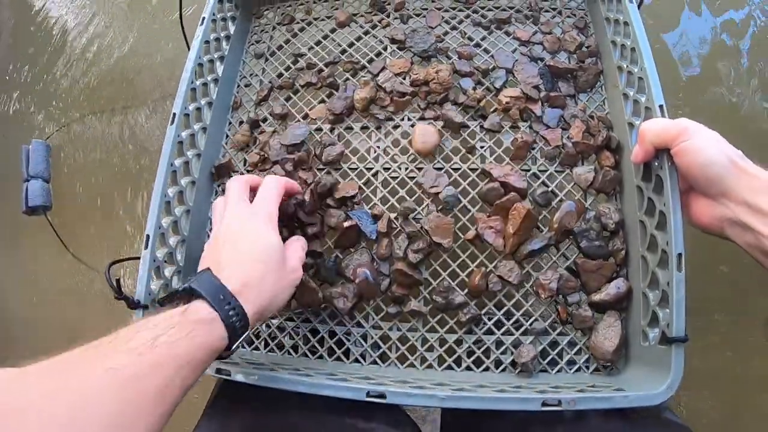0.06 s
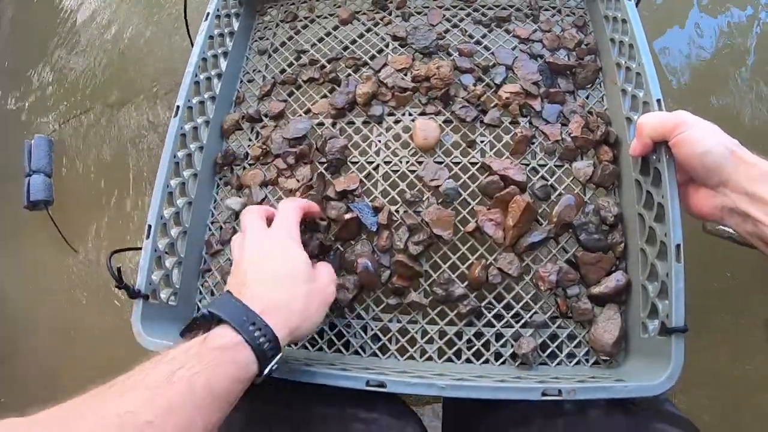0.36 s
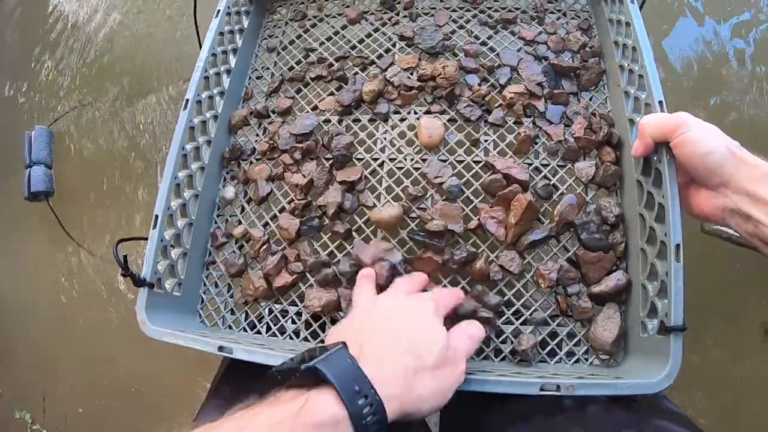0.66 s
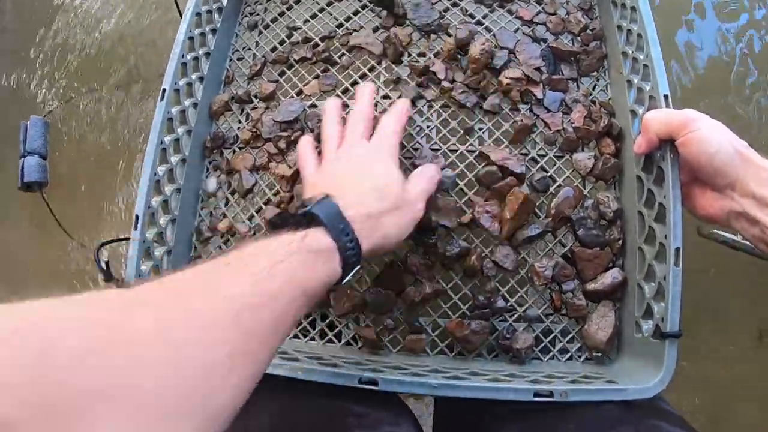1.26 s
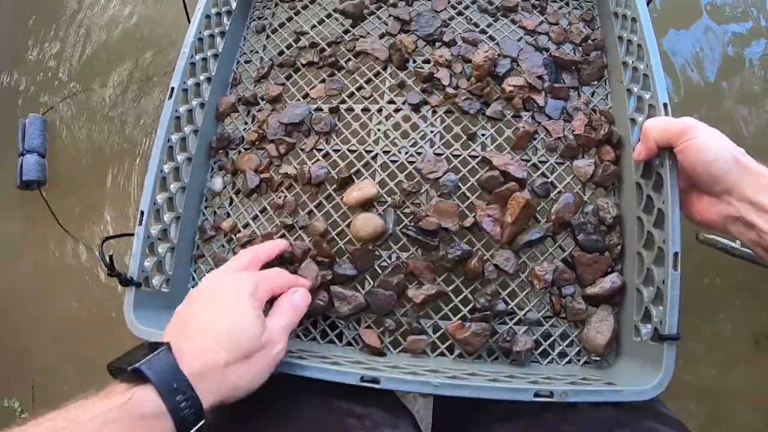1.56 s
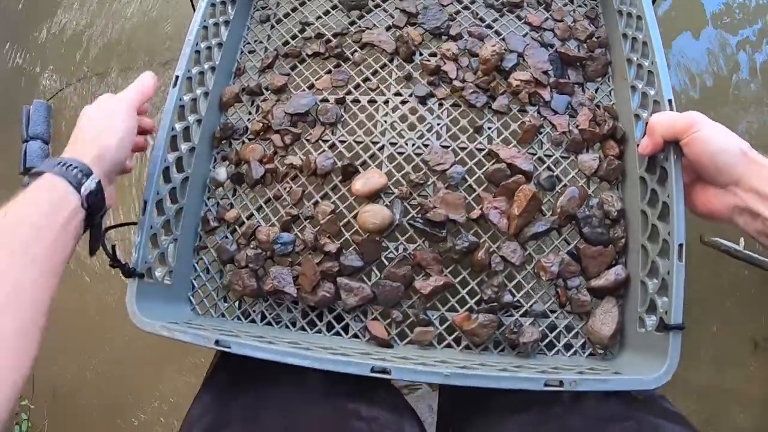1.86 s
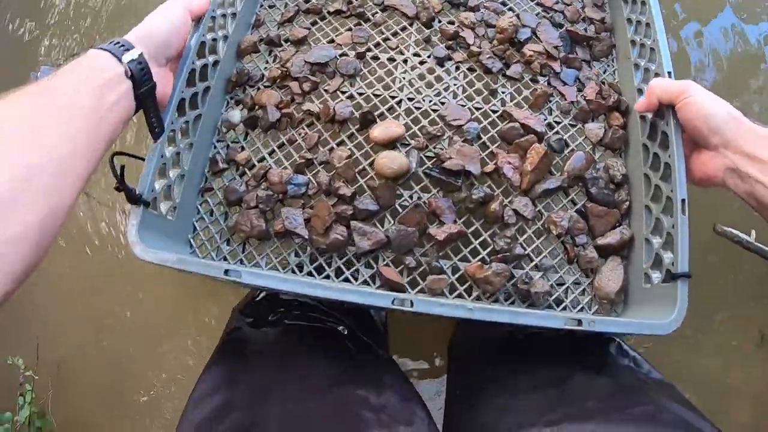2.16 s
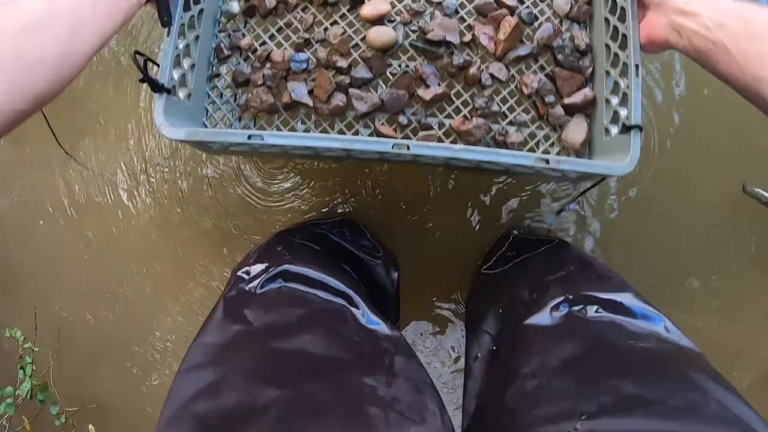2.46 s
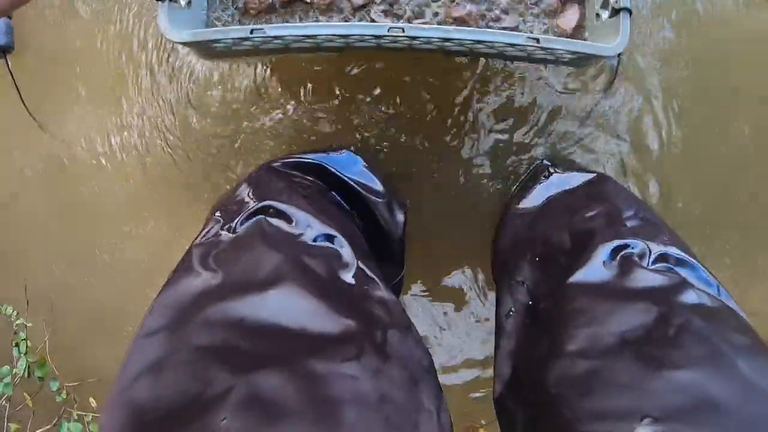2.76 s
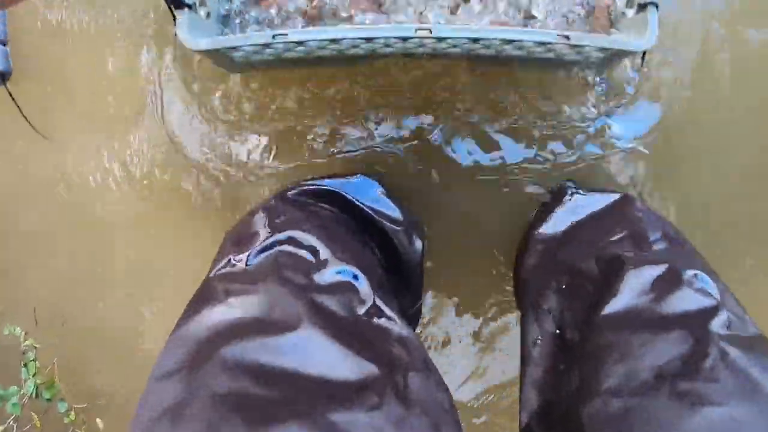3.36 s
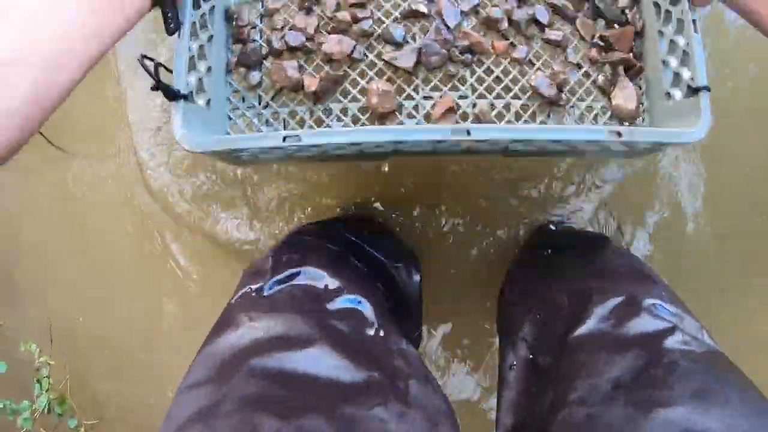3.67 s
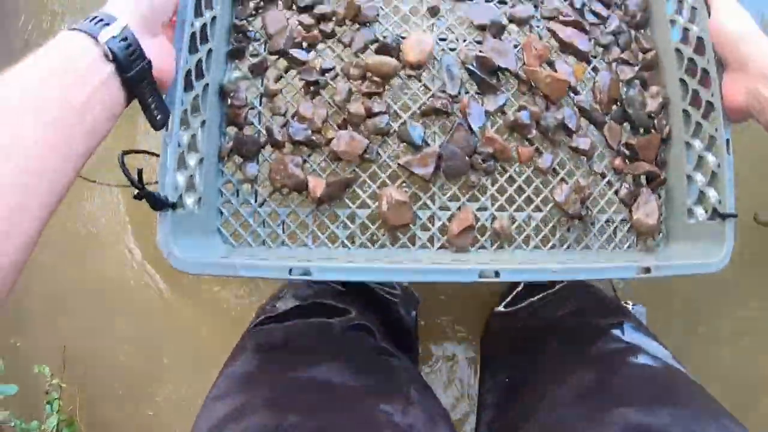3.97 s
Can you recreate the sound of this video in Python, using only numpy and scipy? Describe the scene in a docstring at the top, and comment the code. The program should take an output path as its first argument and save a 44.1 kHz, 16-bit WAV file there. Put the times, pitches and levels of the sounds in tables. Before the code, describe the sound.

Close up and outdoors, stones clatter against plastic mesh in several gritty sweeps. After a brief lull, the basket hits river water with a hiss, then rises gushing and dripping. A soft low hum throbs behind it.

```python
"""Above a river, close to the microphone, a hand rakes wet stones over a plastic mesh basket.
Each impact excites the damped modes of stone and mesh. The basket is slapped onto the water and
jets hiss up through the mesh; it is pushed under, heaved out with a gurgling splash and left to
drain. The water sounds chiefly by bubble resonance: the larger the bubble, the lower its note.
A low hum throbs behind it all."""
import sys
import numpy as np
from scipy import signal
from scipy.fft import rfft, irfft
from scipy.io import wavfile
from scipy.ndimage import uniform_filter1d

SR = 44100
rng = np.random.default_rng(int(sys.argv[2]) if len(sys.argv) > 2 else 0)


def digitize_waveform(pressure):
    """Quantize a signal to 16-bit integers and store it at the path in sys.argv[1].

    Rows of a 2-D input are taken as channels; values are limited to [-1, 1].
    """
    field = np.atleast_2d(pressure).T
    bounded = np.clip(field, -1, 1)
    quanta = np.round(bounded * 32767).astype(np.int16)
    wavfile.write(sys.argv[1], SR, quanta)


N = 176400
T = np.arange(N) / SR
HIT_T = T[:2600]

# Spectral envelopes (frequency [Hz], gain [dB])
AIR_SPECTRUM = [(25, -6.5), (55, -8.5), (85, 5), (130, -7), (300, -7.5), (650, -22.5), (4500, -36.5),
                (7500, -34.5), (15000, -61)]
BASKET_SPECTRUM = [(150, -39), (320, 0), (680, -5.5), (998, -0.5), (1240, -6.5), (1500, 3), (1810, 1.5),
                   (2150, -3.5), (4240, -7.5), (7280, -4.5), (15000, -41.5)]
GRIT_SPECTRUM = [(2000, -8), (7200, 6), (15000, -9.5)]
RUB_SPECTRUM = [(400, -8.5), (1200, 5), (2800, 0.5), (4500, -5.5), (15000, -27)]
JET_SPECTRUM = [(180, -50), (300, -13), (1020, -8.5), (1540, 1), (7500, -2), (15000, -18.5)]
SLAP_SPECTRUM = [(1500, -7), (6500, 4.5), (15000, -21)]
GURGLE_SPECTRUM = [(40, -4), (200, 3.5), (780, -2.5), (2000, -47)]
SPLASH_SPECTRUM = [(400, -32), (900, -2), (2400, -3), (4300, -11), (10000, -44)]
SPRAY_SPECTRUM = [(2500, -23), (4500, -3), (7300, -0.5), (15000, -24)]
BAND_SHAPE = [(25, -15), (45, 0), (9300, 0), (11300, -11.5)]
# Modes of the mesh (frequency [Hz], level [dB], time to fall 60 dB [s])
MESH_MODES = [(1018.5, -7, 0.043), (1514, -18.5, 0.092), (1703, -8, 0.053), (2622, -11.5, 0.042)]
# The hand raking, bumping the basket floor and rubbing the rim (time [s], level [dB])
RAKE_LEVELS = [(0, -38), (.15, -35.5), (.31, -44), (.40, -39), (.50, -31.5), (.69, -29), (.745, -34),
               (.78, -45), (.95, -52), (1.015, -28.5), (1.05, -34.5), (1.2, -50.5), (1.28, -42),
               (1.40, -28), (1.66, -45.5), (1.8, -59.5)]
HAND_BUMPS = [(0.139, -37.5), (.68, -33), (1.237, -37.5)]
RUB_LEVELS = [(1.915, -44), (1.932, -45), (2.01, -48), (2.08, -53), (2.25, -67.5)]
# Stones striking the basket (time [s], level [dB], stone pitch [Hz])
STONE_KNOCKS = [(0.077, -32.5, 1070), (0.133, -27.5, 2000), (.286, -35, 1090), (0.341, -34.5, 1410),
                (0.423, -33, 1720), (0.461, -32, 5900), (0.52, -34, 1780), (0.575, -25, 1920),
                (0.581, -29, 4600), (0.613, -25.5, 1800), (0.636, -28.5, 7100), (0.664, -23, 1850),
                (0.717, -23.5, 1900), (.726, -18, 1770), (0.7342, -20.5, 2300), (.750, -21, 2100),
                (.790, -36.5, 2270), (.822, -33, 1800), (0.854, -35.5, 3070), (.879, -39, 1330),
                (0.917, -46.5, 7150), (.956, -42, 1860), (.987, -30.5, 1680), (.997, -25.5, 1600),
                (1.003, -25, 995), (1.013, -30, 1060), (1.093, -30, 2880), (1.112, -34.5, 2800),
                (1.16, -39, 2580), (1.183, -41, 2270), (1.226, -40, 1670), (1.237, -35.5, 1550),
                (1.257, -40, 2270), (1.314, -28.5, 2630), (1.334, -37, 1640), (1.387, -24.5, 1650),
                (1.426, -27.5, 1510), (1.441, -31.5, 1430), (1.481, -26, 1400), (1.537, -29.5, 5130),
                (1.614, -29.5, 2450), (1.633, -31, 1180), (1.679, -38.5, 1930), (1.688, -33.5, 1630),
                (1.701, -35, 1840), (1.730, -30, 2560), (1.847, -33.5, 1830), (2.176, -45.5, 1970)]
# Single bubbles and drips (time [s], pitch [Hz], level [dB], decay time [s])
SINGLE_BUBBLES = [(1.259, 1840, -26, 0.005), (1.785, 2100, -40, 0.0056), (1.872, 2370, -32.5, 0.0054),
                  (2.24, 3340, -43, 0.0029), (2.565, 620, -15.5, 0.00072), (2.579, 186, -14, 0.0035),
                  (2.685, 317, -23.5, 0.0041), (2.752, 2310, -35.5, 0.0026), (2.762, 1440, -34.5, 0.0028),
                  (2.975, 520, -15, 0.0021), (2.988, 367, -19.5, 0.004), (3.076, 750, -16.5, .002),
                  (3.093, 99, -12.5, 0.011), (3.377, 990, -21.5, 0.0077), (3.803, 7800, -27, 0.0015),
                  (3.891, 2910, -28, 0.0026), (3.904, 6010, -28, 0.0021), (3.924, 1730, -30, 0.0026),
                  (3.95, 3270, -29.5, .0025)]
# Bubble swarms: trickle, spatter, gurgle, gulp and splash of the lift, drips
# (time [s], Gaussian width [s], level [dB], low pitch [Hz], high pitch [Hz], rate [1/s])
BUBBLE_SWARMS = [(2.29, 0.049, -59, 1480, 3300, 680), (2.663, 0.055, -40.5, 1080, 8240, 250),
                 (2.849, 0.013, -49, 598, 1110, 1100), (3.415, 0.026, -20, 433, 712, 1340),
                 (3.408, 0.021, -24.5, 790, 3060, 1300), (3.797, 0.1, -44, 1690, 9360, 80)]
# Water striking plastic (time [s], level [dB], pitch [Hz])
WATER_SLAPS = [(2.590, -23, 2680), (2.605, -30, 7700), (2.991, -36, 6300), (3.199, -26.5, 3000),
               (3.29, -24.5, 6330), (3.310, -22.5, 2320), (3.497, -27, 5450), (3.717, -39, 2310),
               (3.819, -38.5, 2570), (3.956, -40, 4300)]
# Gushes as the basket is heaved out (time [s], hold [s], gurgle [dB], splash [dB], spray [dB])
LIFT_GUSHES = [(2.949, 0.15, -38.5, -41, -48.5), (3.07, 0.078, -25.5, -27, -38),
               (3.225, 0.049, -25.5, -26.5, -33), (3.371, 0.064, -26, -23.5, -33.5)]
# Water shoved by the basket (time [s], level [dB], Gaussian width [s])
SURGES = [(3.11, -35.5, 0.061), (3.179, -29.5, 0.015), (3.43, -36.5, 0.08)]
# Likeness of left and right (frequency [Hz], correlation [ratio])
COHERENCE = [(290, 0.94), (700, 0.48), (3100, 0.76), (7500, 0.15)]
# Stereo balance (frequency [Hz], left minus right [dB])
STONE_BALANCE = [(1300, -1), (5000, -3)]
RIVER_BALANCE = [(950, -2), (15000, -5)]


def amp(db):
    """Decibels to amplitude ratio."""
    return 10 ** (np.asarray(db) / 20)


def unit(x):
    """Normalisation to rms 1."""
    return x / np.sqrt(np.mean(x ** 2) + 1e-20)


def pulse(x):
    """Normalisation to the energy of 10 ms at rms 1."""
    return x * np.sqrt(441 / (np.sum(x ** 2, -1, keepdims=True) + 1e-20))


def read(points, hz):
    """Interpolation on a log-frequency axis."""
    freqs, values = np.transpose(points)
    return np.interp(np.log(hz + 1), np.log(freqs + 1), values)


def envelope(rows):
    """Gain interpolated in decibels, silent outside the rows."""
    times, db = np.transpose(rows)
    return (T >= times[0]) * (T <= times[-1]) * amp(np.interp(T, times, db))


def swell(s, width_s):
    """A Gaussian envelope centred on time s."""
    return np.exp(-((T - s) / width_s) ** 2 / 2)


def add(mix, s, sound):
    """Superposition of a sound starting at time s."""
    part = mix[:, max(round(s * SR), 0):][:, :sound.shape[-1]]
    part += sound[..., :part.shape[1]]


def colour(x, spectrum, size=4096):
    """Causal, minimum-phase filtering."""
    log_gain = np.log(amp(read(spectrum, abs(np.fft.fftfreq(size, 1 / SR)))))
    taps = np.fft.ifft(np.exp(np.conj(signal.hilbert(log_gain)))).real[:size // 2]
    return signal.fftconvolve(x, taps[None], axes=1)[:, :x.shape[1]]


def stereo(pair, balance):
    """Partial coherence: two unrelated signals become a left and right most alike in the bass."""
    hz = np.fft.rfftfreq(N, 1 / SR)
    likeness, tilt = read(COHERENCE, hz), amp(read(balance, hz) / 2)
    mid, side = rfft(pair) * np.sqrt([(1 + likeness) / 2, (1 - likeness) / 2])
    return irfft([(mid + side) * tilt, (mid - side) / tilt], N)


def ring(hz, decay_s):
    """Damped free vibration of one mode, at two random phases."""
    tone = np.sin(2 * np.pi * (hz * HIT_T + rng.random((2, 1))))
    return pulse(tone * np.exp(-HIT_T / decay_s) * (1 - np.exp(-HIT_T * hz * 2)))


def crack(decay_s):
    """A broadband transient: two channels of decaying noise."""
    return pulse(rng.standard_normal((2, len(HIT_T))) * np.exp(-HIT_T / decay_s))


def grains(shapes, per_s, spread_db):
    """Shot noise: each shape recurs at random times and strengths."""
    out = np.zeros((2, N))
    count = int(per_s * N / SR / len(shapes)) + 1
    for shape in shapes:
        at, draw, sign = rng.random((3000, 3))[:count].T
        strength = amp(spread_db * np.minimum(-np.log(1 - draw), 4))
        train = np.zeros(N)
        train[(at * N).astype(int)] = strength * np.sign(sign - 0.5)
        out += signal.oaconvolve(train[None], shape, axes=1)[:, :N]
    return unit(out)


def hum(hz=87.7, roughness=0.71, throb_s=0.593, crest_s=0.55, depth=0.67):
    """Modulation: a low tone wavers at random and throbs periodically."""
    a, b = unit(uniform_filter1d(uniform_filter1d(rng.standard_normal((2, N)), 1400), 700))
    waver = 1 + roughness * (a + 1j * b) / np.sqrt(2)
    tone = (waver * np.exp(2j * np.pi * hz * T)).real
    throb = 1 + depth * np.cos(2 * np.pi * (T - crest_s) / throb_s)
    return amp(-45) * unit(tone * throb)


def river_air():
    """Ambient noise, with most of its power in the bass."""
    return amp(-47.5) * stereo(unit(colour(rng.standard_normal((2, N)), AIR_SPECTRUM)), RIVER_BALANCE)


def stone_contact(hz, contact_s=0.0017, chatter_s=0.004, focus_db_per_octave=4.5):
    """Impact excitation: a chattering stone rings, and drives the basket most near its own pitch."""
    force = np.exp(-HIT_T / contact_s) + amp(-17) * np.exp(-HIT_T / 0.011)
    for rebound_s in rng.uniform(0.2, 1, 2) * chatter_s:
        force += 0.8 * (HIT_T > rebound_s) * np.exp(-abs(HIT_T - rebound_s) / (contact_s / 2))
    force *= np.minimum(HIT_T / 0.001, 1)
    driven = [(f, db - focus_db_per_octave * abs(np.log2(f / hz))) for f, db in BASKET_SPECTRUM]
    basket = pulse(colour(force * rng.standard_normal((2, len(HIT_T))), driven))
    mesh = sum(amp(db) * ring(f * rng.uniform(0.94, 1.05), t60 / np.log(1000))
               for f, db, t60 in MESH_MODES)
    decay_s = 3.4 / hz
    stone = ring(hz, decay_s) + amp(-5.5) * ring(hz * 1.634, decay_s / 2)
    return pulse(basket + amp(-4) * stone + mesh)


def raking():
    """Dense impacts merge into a rattle; the hiss of sand on the mesh follows it by a power law."""
    contacts = [stone_contact(hz) for hz in np.geomspace(1000, 4000, 24)]
    rattle = grains(contacts, per_s=900, spread_db=4.5)
    sand = grains([crack(0.0009) for _ in range(12)], per_s=1200, spread_db=3)
    rake = envelope(RAKE_LEVELS)
    grit_gain = amp(-7.5) * rake.max() * (rake / rake.max()) ** 1.4
    return amp(0.5) * rake * rattle + grit_gain * unit(colour(sand, GRIT_SPECTRUM))


def knocks(thud_hz=350, thud_s=0.0044):
    """Separate impacts: stones knock, and the hand excites two hollow modes of the basket floor."""
    out = np.zeros((2, N))
    for s, db, hz in STONE_KNOCKS:
        add(out, s, amp(db) * stone_contact(hz))
    for s, db in HAND_BUMPS:
        add(out, s, amp(db) * pulse(ring(thud_hz, thud_s) + ring(thud_hz * 1.44, thud_s / 2)))
    return out


def bubble(hz, decay_s, rise_per_decay=0.013):
    """Bubble resonance: a damped sine whose pitch rises as the bubble nears the surface."""
    age = np.arange(0, 7 * decay_s, 1 / SR) / decay_s  # in decay times
    cycles = hz * decay_s * (age + rise_per_decay * age ** 2 / 2)
    return np.sin(2 * np.pi * cycles) * np.exp(-age) * (1 - np.exp(-3 * cycles))


def glugs_and_drips():
    """Resonance falls with size: large air pockets glug and single drips plink."""
    out = np.zeros((2, N))
    for s, hz, db, decay_s in SINGLE_BUBBLES:
        pan_db = rng.uniform(-4.5, 1.2)
        add(out, s, amp([[db + pan_db], [db - pan_db]]) * bubble(hz, decay_s))
    return out


def rim_rub():
    """Friction noise: the hand slides along the rim in many tiny slips."""
    slips = grains([crack(0.0005) for _ in range(8)], per_s=2800, spread_db=2.5)
    return envelope(RUB_LEVELS) * unit(colour(slips, RUB_SPECTRUM))


def froth(low_hz, high_hz, per_s, cycles, spread_db, wash_db, count=28):
    """Incoherent sum of small bubbles, scattered left and right, over a wash of white noise."""
    pitches = np.linspace(low_hz, high_hz, count) * rng.uniform(0.928, 1.04, count)
    decays = cycles * rng.uniform(0.97, 1.3, count) / pitches
    right_gains = rng.uniform(-1.2, 1.86, count)
    shapes = [pulse(bubble(hz, decay_s)) * [[1], [right]]
              for hz, decay_s, right in zip(pitches, decays, right_gains)]
    return unit(grains(shapes, per_s, spread_db) + amp(wash_db) * rng.standard_normal((2, N)))


def swarms():
    """Clouds of resonating bubbles swell and fade."""
    return sum(amp(db) * swell(s, width_s) * froth(low, high, per_s, cycles=5, spread_db=2, wash_db=-29)
               for s, width_s, db, low, high, per_s in BUBBLE_SWARMS)


def jets(start_s=2.577, rise_s=0.0031, hold_s=0.11, sag_db_per_s=86, stop_db_per_s=475.5):
    """Turbulence: water forced through the mesh hisses with noise and entrained bubbles."""
    age = np.maximum(T - start_s, 0)
    fall_db = sag_db_per_s * age + stop_db_per_s * np.maximum(age - hold_s, 0)
    hiss = froth(530, 12160, per_s=7100, cycles=1.9, spread_db=4.5, wash_db=6)
    return np.minimum(age / rise_s, 1) * amp(-23.5 - fall_db) * unit(colour(hiss, JET_SPECTRUM))


def slaps(decay_s=0.0012):
    """Impact of water on plastic: a crack and a heavily damped note."""
    out = np.zeros((2, N))
    for s, db, hz in WATER_SLAPS:
        snap = pulse(colour(crack(decay_s), SLAP_SPECTRUM))
        add(out, s, amp(db) * pulse(snap + amp(3) * ring(hz, decay_s)))
    return out


def flow(layer, linger_s, drain_db, drain_db_per_s, drain_s=3.532, rise_s=0.027, fall_db_per_s=187):
    """Envelope of one water layer: the gushes and the draining are incoherent, so their powers add."""
    onset = np.clip((T - drain_s) / rise_s + 1, 0, 1)
    power = (onset * amp(drain_db - drain_db_per_s * np.maximum(T - drain_s, 0))) ** 2
    for s, hold_s, *layer_db in LIFT_GUSHES:
        onset = np.clip((T - s) / rise_s, 0, 1)
        falling_s = np.maximum(T - s - rise_s - hold_s - linger_s, 0)
        power += (onset * amp(layer_db[layer] - fall_db_per_s * falling_s)) ** 2
    return np.sqrt(power)


def gushes():
    """Air entrainment: water pouring from the basket traps large, medium and fine bubbles."""
    gurgle = froth(135, 890, per_s=500, cycles=3.2, spread_db=1.5, wash_db=1)
    splash = froth(809, 4273, per_s=1800, cycles=5.3, spread_db=2.5, wash_db=-1.5)
    spray = froth(3740, 11000, per_s=2400, cycles=9.3, spread_db=4, wash_db=1)
    return (flow(0, 0, drain_db=-38.5, drain_db_per_s=59) * unit(colour(gurgle, GURGLE_SPECTRUM))
            + flow(1, 0.04, drain_db=-41, drain_db_per_s=20.5) * unit(colour(splash, SPLASH_SPECTRUM))
            + flow(2, 0.04, drain_db=-44, drain_db_per_s=-0.5) * unit(colour(spray, SPRAY_SPECTRUM)))


def surges(top_hz=95.4):
    """Volume displacement: water shoved by the basket makes swells of low noise."""
    band = signal.butter(2, [top_hz / 3, top_hz], "band", fs=SR, output="sos")
    rumble = unit(signal.sosfilt(band, rng.standard_normal((2, N))))
    return rumble * sum(amp(db) * swell(s, width_s) for s, db, width_s in SURGES)


def scene():
    """Linear superposition of all sources in the open air."""
    basket = stereo(knocks() + raking() + rim_rub(), STONE_BALANCE)
    water = stereo(jets() + gushes() + swarms() + slaps() + surges(), RIVER_BALANCE)
    return basket + water + glugs_and_drips() + hum() + river_air()


def record(dry, cutoff_hz=15800):
    """Band limiting: softens the deepest bass and the treble above 9 kHz, then a steep low-pass."""
    low_pass = signal.firwin(511, cutoff_hz, window=("kaiser", 9), fs=SR)
    return signal.oaconvolve(colour(dry, BAND_SHAPE), low_pass[None], "same", axes=1)


dry = scene()
out = record(dry)
digitize_waveform(out)
```